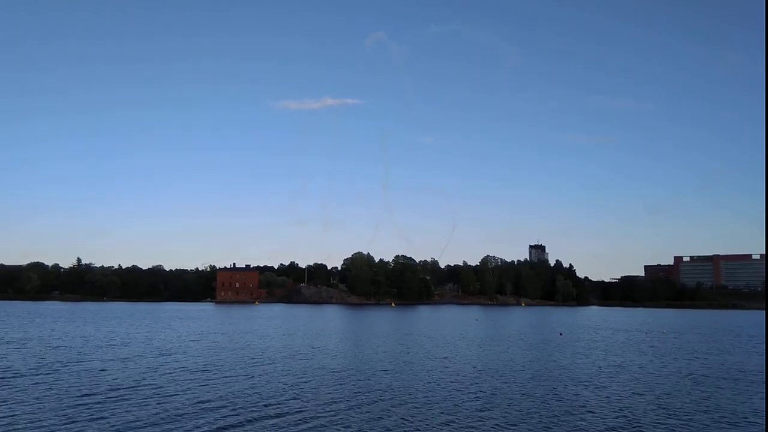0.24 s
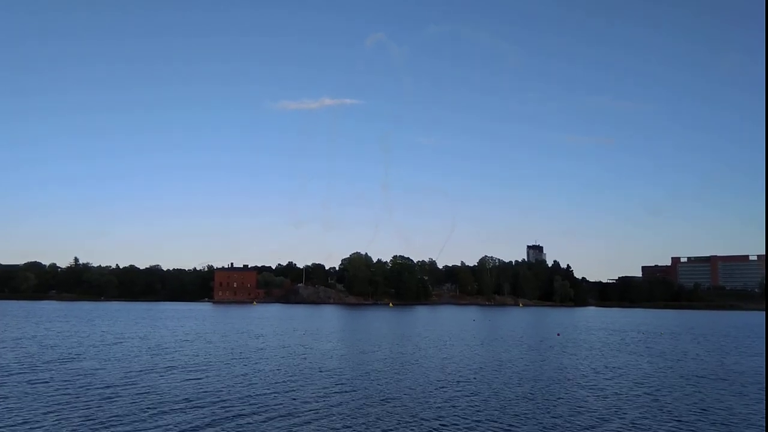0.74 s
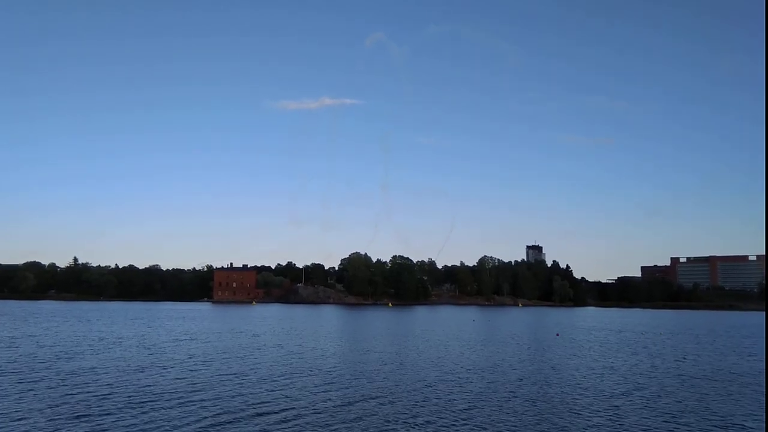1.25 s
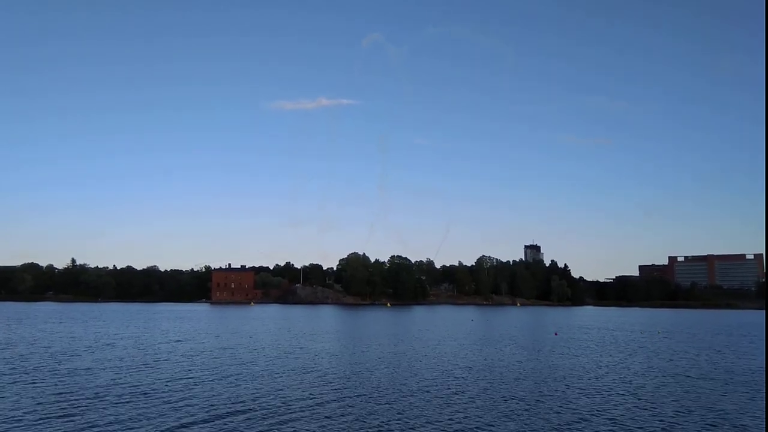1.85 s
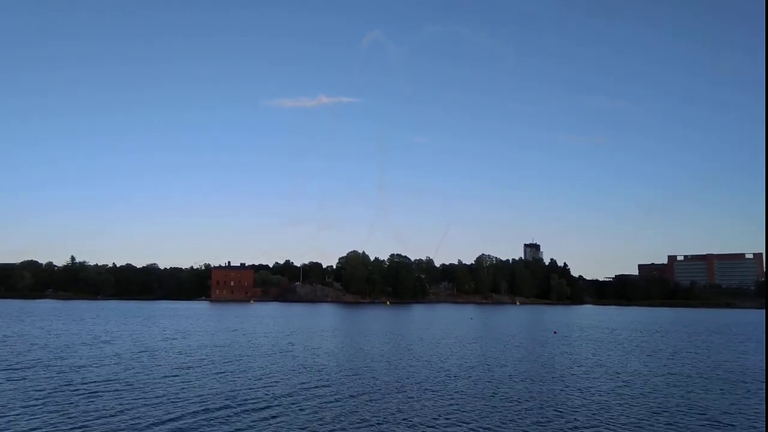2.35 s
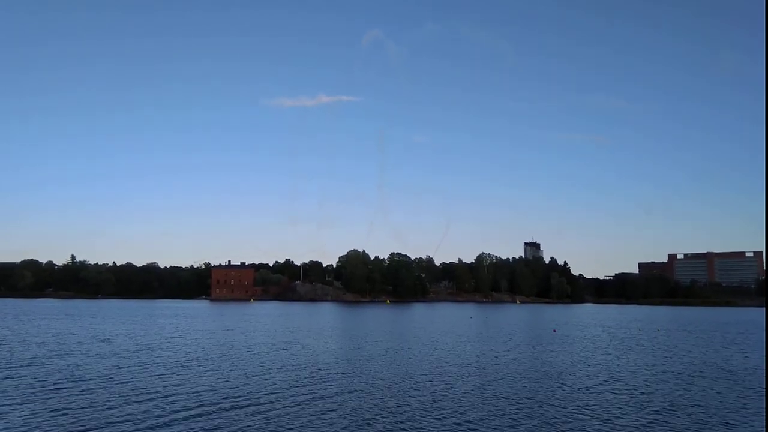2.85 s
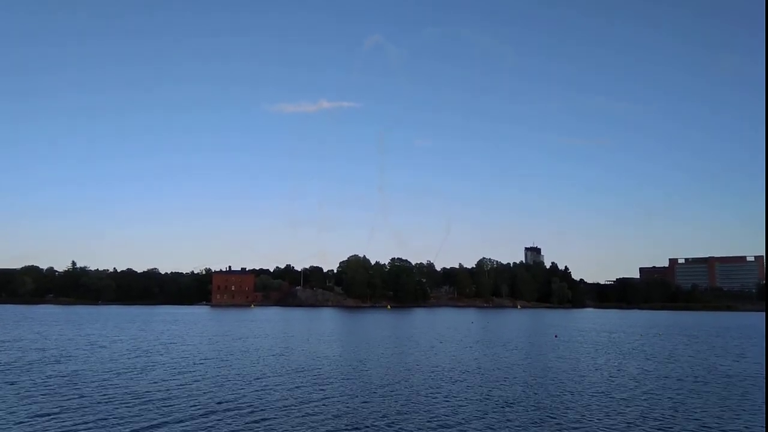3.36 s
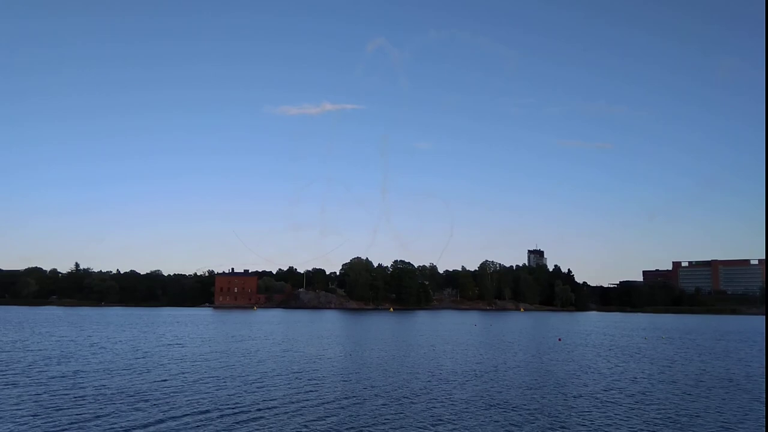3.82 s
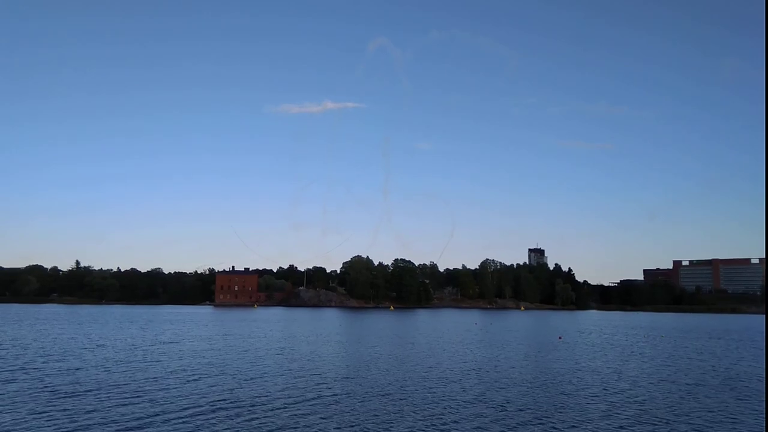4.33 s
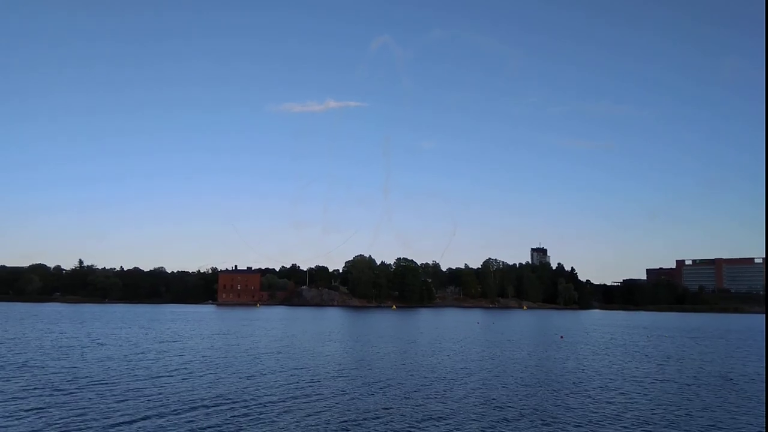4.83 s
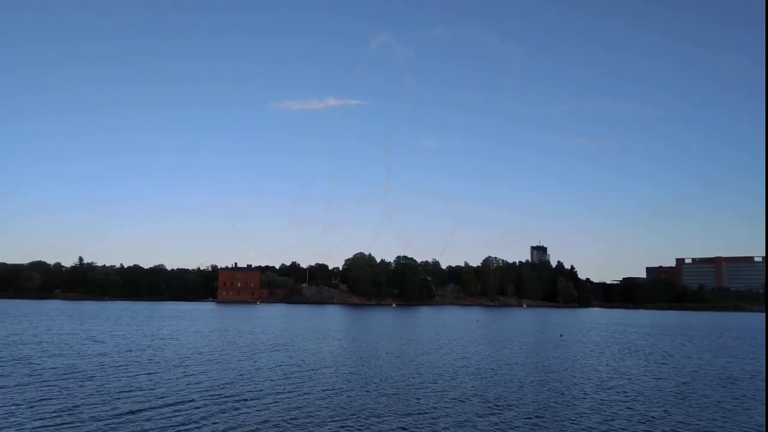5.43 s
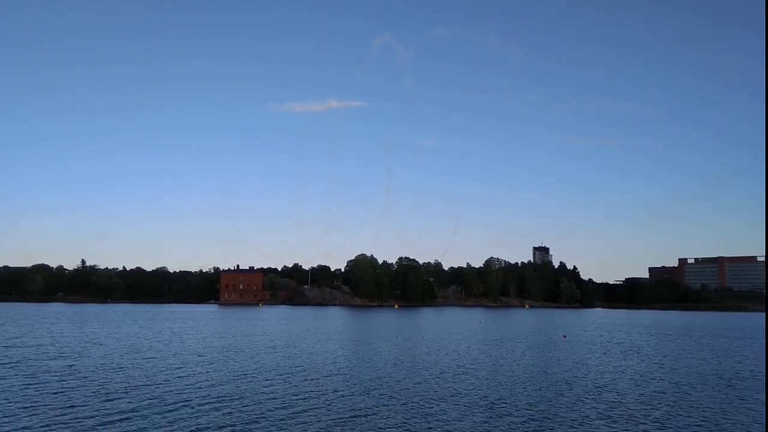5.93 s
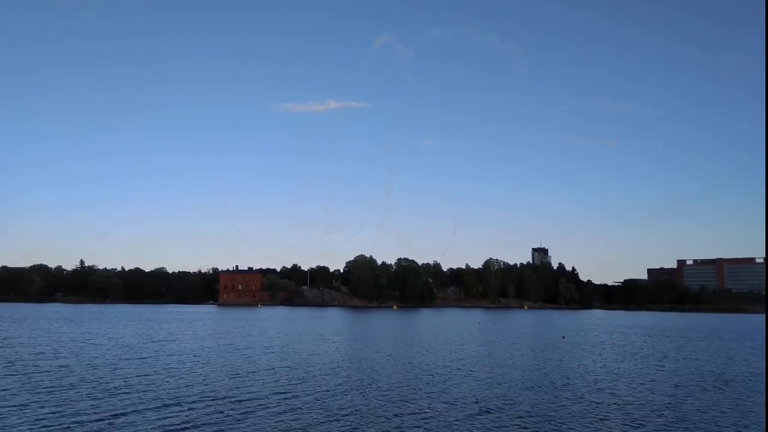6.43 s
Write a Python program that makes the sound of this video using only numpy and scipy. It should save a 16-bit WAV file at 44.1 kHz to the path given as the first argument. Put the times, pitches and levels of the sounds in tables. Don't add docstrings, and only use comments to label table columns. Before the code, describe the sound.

At 0 s a small wave is already breaking on a stony lake shore: a dense half-second flurry of wet slaps, splashing foam and round bubble plops. From 0.5 to 1.7 s the backwash fizzes and drains, with lesser wavelets near 0.7 and 1.35 s and gurgles between stones. The strongest later slap bursts around 1.85-2.1 s, followed by hollow bubbling and small lap sounds to 2.6 s. Another slosh arrives at 2.8-3 s, then a light one at 3.4 s. Around 4-4.5 s there are softer laps and low glugs; near 4.95 s a short splash, then sparse plops, ticks and fine drops as the foam thins. Quiet gurgling remains through 6.6 s. A very faint low traffic rumble and machine hum lie beneath. Close, dry, open-air single-channel sound from a small camera, with faint filtered hiss and limited treble.

```python
import sys
import numpy as np
from scipy import signal
from scipy.fft import rfft, irfft, next_fast_len
from scipy.io import wavfile
from scipy.ndimage import uniform_filter1d, minimum_filter1d

SR = 44100
rng = np.random.default_rng(int(sys.argv[2]) if len(sys.argv) > 2 else 0)


def level_to_linear(level):
    exponent = np.asarray(level, float) / 20
    return 10 ** exponent


def master_out(mix):
    frames = np.transpose(np.atleast_2d(mix))
    ceiling = np.clip(frames, -1, 1)
    pcm = np.round(ceiling * 32767).astype(np.int16)
    wavfile.write(sys.argv[1], SR, pcm)


N = 294588


def unit(x):
    return x / np.sqrt(np.mean(x ** 2) + 1e-20)


def filtered(x, response):
    m = next_fast_len(N + 8192)
    spectrum = rfft(x, m) * response(np.fft.rfftfreq(m, 1 / SR))
    return irfft(spectrum, m)[:N]


def coloured(x, points):
    f, db = np.transpose(points)

    def response(hz):
        return level_to_linear(np.interp(np.log(hz + 1), np.log(f), db, -120, -120))

    return unit(filtered(x, response))


def band(x, lo_hz, hi_hz, order):
    return unit(bandpass(x, lo_hz, hi_hz, order))


def bandpass(x, lo_hz, hi_hz, order):
    return signal.sosfilt(signal.butter(order, [lo_hz, hi_hz], "band", fs=SR, output="sos"), x)


def fine(x):
    return np.interp(np.arange(N) / SR * 1000, np.arange(len(x)), x)


def milliseconds():
    return np.arange(N * 1000 // SR + 2) / 1000


def summed(db):
    return 10 * np.log10(np.sum(level_to_linear(db) ** 2, axis=0))


def bubbles(s, size, hz, life, rise, swell):
    t = np.arange(int(4 * np.max(life) * SR)) / SR
    u = t / life[:, None]
    tone = np.sin(2 * np.pi * hz[:, None] * t * (1 + rise * u / 2))
    wave = size[:, None] * tone * np.exp(-u) * (1 - np.exp(-u / swell))
    start = np.round(s * SR).astype(int)[:, None]
    at = (start + np.arange(len(t))).clip(0, N)
    return np.bincount(at.ravel(), wave.ravel(), N + 1)[:N]


def town():
    # frequency in Hz, level in dB
    rumble_tone = [(15, -47), (25, -34), (54, 5.5), (113, 2.5), (168, -1), (286, -3.5), (342, -9),
                   (520, -13.5), (680, -61), (1140, -120)]
    # pitch in Hz, width in Hz, level in dB
    hum = (123, 9.1, -61)
    hz, width, db = hum
    line = filtered(rng.standard_normal(N), lambda f: 1 / (1 + (2 * (f - hz) / width) ** 2))
    rumble = coloured(rng.standard_normal(N), rumble_tone)
    return level_to_linear(-59) * rumble + level_to_linear(db) * unit(line)


def laps():
    # time in seconds, strength in dB
    ebbing = [(0.0, -38), (0.6, -44), (1.1, -44), (1.6, -46.5), (2.7, -46.5), (3.5, -50), (4.4, -57.5),
              (4.9, -55), (5.7, -59), (6.68, -61)]
    # crest in seconds, foam in dB, length in seconds,
    # slosh over foam in dB, spray over foam in dB
    wavelets = [(0.01, -37, 0.43, -6, -23), (0.142, -33, 0.37, -14.5, -23), (0.385, -40.5, 0.96, -27, -14),
                (0.702, -41, 0.24, -6, -14), (1.358, -38.5, 0.2, -10, -16), (1.891, -41, 0.23, 3.5, -12.5),
                (2.073, -52.5, 0.39, 5, -9), (2.384, -41, 0.13, -0.5, -24), (2.493, -46, 0.17, 0.5, -25),
                (2.902, -36, 0.067, -5, -16), (3.392, -51.5, 0.47, -1.5, -26), (3.607, -51.5, 0.13, 3, -30),
                (3.927, -44.5, 0.21, -22, -14.5), (4.202, -47.5, 0.47, -5.5, -9),
                (4.475, -60.5, 0.42, -4, -6), (4.75, -49, 0.09, -15, -13), (4.966, -42, 0.12, -2, -13.5),
                (5.14, -56, 0.11, -1, -25), (5.366, -54.5, 0.25, 2, -29), (5.46, -53.5, 0.23, -14, -13),
                (5.729, -54.5, 0.14, 2, -20), (5.943, -48, 0.19, -2, -11), (6.208, -58.5, 0.03, 8.5, 1),
                (6.485, -56.5, 0.84, 2.5, -6)]
    run_up, drain_db = 0.48, 14.5
    t = milliseconds()
    s, db, length, slosh_db, spray_db = np.transpose(wavelets)[:, :, None]
    u = (t - s) / length
    lap = db - drain_db * np.maximum(-u / run_up, u / (1 - run_up)) ** 0.88
    ebb = np.interp(t, *np.transpose(ebbing))
    slosh_bed = -59 + 0.089 * (ebb + 50)
    foam_bed = ebb - 6.5 + 0.3 * (ebb + 50)
    spray_bed = -59.5 + (ebb + 50)
    slosh = summed(np.vstack([lap + slosh_db, slosh_bed]))
    foam = summed(np.vstack([lap, foam_bed]))
    spray = summed(np.vstack([lap + spray_db, spray_bed]))
    return fine(slosh), fine(foam), fine(spray), fine(ebb - 3)


def crackle(per_s, spread_db):
    draw = rng.random((int(per_s * N / SR), 3))
    hz = 1300 * np.exp(2.407 * draw[:, 1])
    size = level_to_linear(spread_db * np.minimum(-np.log(draw[:, 2] + 1e-9), 4.5))
    return unit(bubbles(draw[:, 0] * N / SR, size, hz, 2.8 / hz, rise=0.034, swell=0.11))


def patches(x, depth_db, tall, long):
    z = signal.stft(x, nperseg=512)[2]
    field = rng.standard_normal(z.shape)
    for _ in range(2):
        field = uniform_filter1d(uniform_filter1d(field, tall, 0), long, 1)
    return signal.istft(z * level_to_linear(depth_db * unit(field)), nperseg=512)[1][:N]


def wash():
    # frequency in Hz, level in dB per Hz
    slosh_tone = [(1150, 1.5), (1380, 9), (1800, 3), (2200, 2), (2800, -6)]
    foam_tone = [(1060, -79), (1800, -15.5), (2250, -1.5), (2750, -1), (3140, 1.5), (5370, -10),
                 (6890, -13), (8000, -47), (10400, -79), (17600, -120)]
    spray_tone = [(3820, -6), (7000, 2), (8770, -2.5), (14500, -5), (15100, -8), (15900, -4)]
    fizz_tone = [(1200, -42), (1900, 6.5), (2700, -1), (3700, 3), (4600, 0.5), (6200, -7.5), (7300, -25),
                 (8500, -42), (10400, -85)]
    # time in seconds, level against the fine ones in dB
    coarse_share = [(0, -4.5), (.9, -0.5), (1.02, -11), (1.25, -4.5), (1.36, -0.5), (1.52, -3.5),
                    (1.72, -1.5), (1.82, -9), (2.15, 2), (2.25, -8), (2.35, -1), (3.101, 1), (3.3, 1),
                    (3.45, -1), (3.75, -2.5), (3.95, -1.5), (4.3, -5), (4.6, 4), (6.68, -5.5)]
    slosh_db, foam_db, spray_db, fizz_db = laps()
    pops = crackle(1500, spread_db=3.5)

    def noise(share):
        return share * pops + rng.standard_normal(N)

    slosh = coloured(patches(noise(0.6), depth_db=2, tall=2, long=9), slosh_tone)
    foam = coloured(patches(noise(0.35), depth_db=1.5, tall=4, long=8), foam_tone)
    spray = coloured(patches(noise(1.0), depth_db=1.0, tall=8, long=6), spray_tone)
    fizz = coloured(patches(noise(0.19), depth_db=2.0, tall=2, long=18), fizz_tone)
    older = level_to_linear(foam_db) * foam + level_to_linear(fizz_db) * fizz
    coarse = filtered(older, lambda hz: 1 / (1 + (hz / 2550) ** 12))
    share = level_to_linear(np.interp(np.arange(N) / SR, *np.transpose(coarse_share)))
    return level_to_linear(slosh_db) * slosh + older + (share - 1) * coarse + level_to_linear(spray_db) * spray


def filling(rows, trickle_db, trickle_hz):
    t = milliseconds()
    s, length, db, hz = np.transpose(rows)[:, :, None]
    fill_db = 518 * np.maximum(s - t, 0)
    empty_db = 263 * np.maximum(t - s - length, 0)
    level = np.vstack([db - fill_db - empty_db, trickle_db + 0 * t])
    pitch = np.append(hz, trickle_hz)[level.argmax(axis=0)]
    return fine(summed(level)), fine(pitch)


def pocket(level_db, centre_hz, count=2600):
    draw = rng.standard_normal((count, 2))
    s = rng.random(count) * (N - 1) / SR
    hz = centre_hz[(s * SR).astype(int)] * np.exp(0.038 * draw[:, 0])
    swarm = bubbles(s, level_to_linear(1.6 * draw[:, 1]), hz, 8 / hz, rise=0.00045, swell=0.13)
    return level_to_linear(level_db - 4.5) * unit(swarm)


def gurgle():
    # start in seconds, length in seconds, level in dB, pitch in Hz
    deep_pockets = [(0.02, 0.022, -45, 698), (0.13, 0.03, -60, 840), (0.72, 0.03, -60, 710),
                    (1.05, 0.074, -49.5, 800), (1.16, 0.097, -48.5, 816), (1.39, 0.12, -43.5, 726),
                    (2.0, 0.15, -45.5, 787), (2.2, 0.27, -43, 721), (2.57, 0.027, -48, 876),
                    (2.82, 0.11, -44.5, 795), (3.04, 0.14, -49, 714), (3.25, 0.048, -57, 740),
                    (3.45, 0.029, -68, 804), (4.26, 0.051, -60, 690), (4.32, 0.095, -49, 708),
                    (4.46, 0.018, -56, 710), (4.83, 0.084, -48.5, 827), (5.33, 0.05, -49, 772),
                    (5.74, 0.03, -59, 720), (6.2, 0.038, -48.5, 783), (6.28, 0.038, -49.5, 710),
                    (6.39, 0.048, -49, 676.6), (6.56, 0.086, -52, 753), (6.64, .05, -59, 680)]
    shallow_pockets = [(0.03, 0.078, -46.5, 905), (0.32, 0.066, -44.5, 1157), (0.53, 0.033, -48, 1110),
                       (0.72, 0.12, -60, 1216), (0.87, 0.015, -44, 970), (1.15, 0.16, -63, 894),
                       (1.33, 0.14, -48.5, 878), (1.86, 0.02, -41, 1084), (1.97, 0.24, -59, 985),
                       (2.28, 0.14, -47.5, 977), (2.57, 0.03, -47, 928), (2.84, 0.15, -51, 1140),
                       (2.96, 0.14, -44.5, 975), (3.16, 0.073, -48, 1027), (3.45, .04, -72, 893),
                       (3.6, 0.076, -51, 906), (3.95, 0.08, -58.5, 1010), (4.02, 0.33, -50.5, 958),
                       (4.65, 0.18, -51, 893), (4.97, 0.06, -47.5, 986), (5.04, 0.05, -50, 993),
                       (5.38, 0.039, -44.5, 957), (5.47, 0.13, -49, 1250), (2.76, 0.037, -50, 970),
                       (5.63, 0.033, -52, 960), (5.7, 0.051, -73, 980), (5.9, 0.23, -48, 1074),
                       (6.28, .05, -66, 1070), (6.56, .12, -44.5, 1000)]
    # level in dB, pitch in Hz
    trickle = (-64, 2200), (-64, 1200)
    deep = pocket(*filling(deep_pockets, *trickle[0]))
    shallow = pocket(*filling(shallow_pockets, *trickle[1]))
    return deep + shallow


def slaps():
    # time in seconds, peak in dB, ring in Hz, spray in dB
    breaking = [(0.0318, -20, 3430, -15), (0.0715, -20, 3420, -18), (0.1083, -25, 3500, -16),
                (0.1359, -16.5, 3100, -19), (0.148, -16.5, 3100, -28), (0.163, -15, 3280, -22),
                (0.1834, -18.5, 3190, -30), (0.191, -17, 3480, -28), (0.2338, -19, 3100, -35),
                (0.2526, -14.5, 2400, -41), (0.2706, -20, 2560, -33), (0.2992, -19, 2020, -28),
                (0.3046, -19, 2930, -38), (0.3209, -12.5, 3060, -44), (0.359, -17, 1900, -35),
                (0.389, -21, 1910, -30), (0.4185, -24.5, 1940, -31)]
    wavelet_slaps = [(0.5300, -21, 2280, -22), (0.863, -23, 3030, -22), (0.886, -25.5, 1930, -27),
                     (1.356, -23, 3170, -30), (1.3942, -23.5, 2500, -28), (1.7604, -27, 1870, -33),
                     (1.8488, -17, 3780, -22), (1.9008, -19, 1860, -31), (1.9634, -9.5, 2130, -34),
                     (1.999, -13.5, 2640, -30), (2.038, -27, 1700, -32), (2.0547, -13, 2120, -27),
                     (2.0992, -21, 2420, -27), (2.351, -23.5, 3420, -17), (2.4215, -26.5, 2650, -28),
                     (2.5135, -27, 2060, -36), (2.7924, -27.5, 3050, -30), (2.836, -31, 2250, -32),
                     (2.857, -16, 2080, -31), (2.911, -20.5, 2080, -22), (5.28, -33.5, 2030, -32),
                     (3.3528, -32, 3200, -12), (3.4090, -22, 1950, -34), (3.4344, -26.5, 3500, -41),
                     (3.468, -29, 3530, -37), (5.358, -31, 3930, -31), (3.9558, -26, 1930, -18),
                     (4.94, -26.5, 1960, -19), (4.971, -27, 1750, -35), (5.9155, -33.5, 3080, -35)]
    water, spray = np.zeros(N + SR), np.zeros(N + SR)
    t = np.arange(SR // 16) / SR
    fade = level_to_linear(-60 * t / 0.036)
    spray_fade = level_to_linear(-60 * t / 0.039)
    crack_fade = level_to_linear(-60 * t / 0.006) * (1 - np.exp(-t / 0.0001))
    for s, db, hz, spray_db in [*breaking, *wavelet_slaps]:
        burst = rng.standard_normal((3, len(t)))
        ring = band(burst[0], hz / 1.32, hz * 1.14, order=2)
        splash = band(burst[1], 1440, 4000, order=2)
        crack = 7 * np.sin(2 * np.pi * hz * t) * crack_fade
        start = round(s * SR)
        water[start:][:len(t)] += level_to_linear(db - 17.5) * ((1.63 * ring + 1.57 * splash) * fade + crack)
        spray[start:][:len(t)] += level_to_linear(db + spray_db - 4.0) * burst[2] * spray_fade
    soft = bandpass(water, 1150, 5800, order=3)
    return (soft + bandpass(spray, 6000, 15500, order=4))[:N]


def gulps():
    # time in seconds, peak in dB, pitch in Hz, life in seconds
    large_bubbles = [(0.058, -28, 1380, .02), (0.1, -35, 1450, .03), (0.146, -36, 1410, .02),
                     (0.097, -34, 880, .02), (0.14, -30.5, 890, 0.021), (0.239, -24, 1406, 0.0079),
                     (0.32, -24.5, 1005, 0.0085), (0.359, -30, 1348, 0.033), (0.389, -31, 1090, 0.014),
                     (0.724, -35, 690, 0.037), (4.958, -26, 1610, .03), (1.046, -32, 809, 0.013),
                     (1.164, -25.5, 879, 0.027), (1.348, -36, 880, 0.018), (1.961, -34, 1440, 0.0069),
                     (1.998, -20, 1430, 0.01), (2.047, -29.5, 730, 0.037), (2.093, -27, 846, 0.03),
                     (2.261, -25.5, 781, 0.031), (2.706, -32, 730, 0.01), (2.827, -24.5, 840, 0.0064),
                     (2.987, -32, 1052, 0.02), (3.448, -34, 870, 0.061), (5.15, -38.5, 1465, 0.047),
                     (5.2, -40.5, 1420, 0.028), (1.1, -37, 1905, 0.033), (1.56, -43, 2100, .03),
                     (3.28, -41, 1546, 0.027), (5.611, -34, 1278, 0.012), (0.52, -37, 990, 0.032),
                     (3.781, -33, 951, 0.02), (3.578, -30, 1330, 0.016), (3.962, -26, 1030, 0.013),
                     (4.16, -37.5, 1390, 0.051), (4.256, -21.5, 683, 0.015), (4.398, -21, 679, 0.015),
                     (4.968, -28.5, 963, 0.012), (5.3, -35, 2080, 0.048), (5.377, -29.5, 1284, 0.02),
                     (1.62, -39, 1706, 0.037), (1.69, -49, 1750, 0.028), (3.15, -36.5, 1273, 0.034),
                     (3.2, -36.5, 1600, 0.026), (5.493, -27.5, 1231, 0.025), (5.546, -31.5, 1260, 0.047),
                     (5.745, -29.5, 734, 0.019), (6.197, -36.5, 1170, 0.016), (6.557, -33.5, 740, 0.087),
                     (6.645, -27, 719, 0.078)]
    # time in seconds, peak in dB, pitch in Hz
    low_glugs = [(0.277, -34, 529), (0.328, -34.5, 426), (0.369, -32.5, 458), (0.585, -40, 362),
                 (0.855, -37.5, 397), (2.578, -40.5, 366), (3.666, -38.5, 394), (4.237, -35.5, 420),
                 (4.279, -31, 410), (5.739, -58, 614), (6.326, -35.5, 346)]
    blips = [(0.739, -51, 730), (0.788, -39.5, 813), (1.079, -53, 937), (1.209, -51, 912),
             (1.328, -40, 854), (1.409, -33, 709), (1.42, -31.5, 843), (1.477, -34, 740), (1.509, -39, 750),
             (2.006, -38.5, 823), (2.137, -33.5, 880), (2.197, -39, 733), (2.223, -36, 689),
             (2.329, -38.5, 810), (2.376, -36.5, 735), (2.419, -33.5, 705), (2.475, -38.5, 843),
             (2.509, -40, 866), (2.566, -39, 917), (2.599, -39.5, 957), (2.771, -44, 918),
             (2.882, -38, 824), (2.919, -38.5, 737), (3.012, -39.5, 1000), (3.048, -34.5, 720),
             (3.084, -39, 682), (3.157, -38.5, 740), (3.199, -48, 701), (3.229, -45, 937),
             (3.257, -40.5, 739), (3.286, -45, 740), (3.324, -49, 929), (3.372, -41, 1075),
             (3.636, -39, 988), (3.708, -36.5, 957), (4.03, -37, 1024), (4.081, -42.5, 950),
             (4.114, -44, 960), (4.314, -43.5, 650), (4.419, -40, 680), (4.469, -41, 696),
             (4.568, -42, 1020), (4.648, -41, 956), (4.693, -36.5, 928), (4.72, -39, 880),
             (4.778, -36.5, 930), (4.828, -44, 914), (4.856, -41, 819), (4.885, -45, 826),
             (4.909, -48, 821), (5.051, -42, 958), (5.078, -42, 953), (5.135, -45, 1090),
             (5.195, -49, 1040), (5.327, -38, 806), (5.409, -44, 1010), (5.456, -36, 1200),
             (5.64, -43, 920), (5.785, -44, 770), (5.819, -48, 960)]
    glug_rows = [(s, db, hz, 0.014) for s, db, hz in low_glugs]
    blip_rows = [(s, db + 6, hz, 17.2 / hz) for s, db, hz in blips]
    s, db, hz, life = np.transpose([*large_bubbles, *glug_rows, *blip_rows])
    life = np.clip(life, 0.003, 0.06) / 2
    return bubbles(s - 0.003, level_to_linear(db - 2.0), hz, life, rise=0.0069, swell=0.48)


def ticks():
    # time in seconds, peak in dB, pitch in Hz
    bursts = [(0.0608, -25, 3360), (0.2106, -16, 3060), (0.498, -29, 2050), (0.5557, -24, 2080),
              (0.846, -26, 3500), (0.9152, -30, 1970), (0.961, -25, 3120), (1.0063, -26, 2800),
              (1.0498, -33, 3280), (1.0971, -39, 3320), (1.143, -32, 3040), (1.207, -28, 2750),
              (1.2643, -43, 2720), (1.3287, -24, 4040), (1.3794, -22, 3500), (1.4194, -21.5, 2060),
              (1.478, -41, 3100), (1.682, -29, 3780), (1.7102, -27, 2380), (2.0768, -26, 1800),
              (2.399, -26, 2140), (2.845, -23, 2200), (2.9039, -20, 2270), (2.969, -29, 2260),
              (3.0266, -22.5, 3160), (3.0957, -26.5, 2550), (3.1845, -37, 2260), (3.427, -25.5, 2000),
              (3.5563, -39, 3440), (3.8592, -31, 3500), (3.8974, -30, 2770), (3.9144, -38, 2870),
              (4.0335, -27.5, 4000), (4.107, -46, 3100), (4.1506, -32, 2040), (4.2078, -30, 2100),
              (4.3545, -30.5, 4900), (4.4339, -34, 2730), (4.4594, -31, 2550), (4.5117, -35, 3700),
              (4.761, -35, 2300), (4.947, -23, 2010), (4.9594, -27, 2100), (4.984, -32, 2500),
              (5.0948, -30.5, 3750), (5.3159, -27.5, 2050), (5.3912, -34, 3200), (5.9575, -28, 2390),
              (6.4553, -36, 2200)]
    s, db, hz = np.transpose(bursts)
    partner_hz = hz * np.exp(0.43 * rng.standard_normal(len(s))).clip(0.6, 1.7)

    def ring(late_s, size_db, f, cycles):
        return bubbles(s + late_s, level_to_linear(db + size_db), f, cycles / f, rise=0.014, swell=0.13)

    body = ring(0, -5.5, hz, 5.2)
    partner = ring(0.00116, -8.5, partner_hz, 5.2)
    snap = ring(0, -5.0, 1.86 * hz, 1.0)
    return body + partner + snap


def droplets():
    # time in seconds, peak in dB
    dry_drops = [(0.5292, -41), (0.812, -35), (1.4151, -35), (1.679, -38), (1.8447, -39), (1.9654, -39),
                 (1.9963, -43), (2.0552, -42), (2.0981, -42), (2.4054, -37), (2.8574, -33), (2.9018, -37),
                 (3.3507, -43), (4.2577, -40), (4.2881, -41), (6.5106, -63)]
    hissing_drops = [(0.9594, -39), (1.1443, -41), (3.1567, -46), (3.2281, -48), (4.1614, -44), (4.2094, -53),
                     (4.3076, -43), (4.5094, -67), (4.6783, -43.5), (4.9594, -54), (5.0994, -51),
                     (5.2894, -60), (5.5174, -49.5), (5.67, -50), (5.6979, -46.5), (5.8566, -46.5),
                     (6.2033, -59), (6.328, -47), (6.5291, -51)]
    out, t = np.zeros(N + SR), np.arange(SR // 8) / SR
    for rows, hiss_db in ((dry_drops, -40), (hissing_drops, -22)):
        fade = level_to_linear(-60 * t / 0.02) + level_to_linear(hiss_db - 60 * t / 0.25)
        for s, db in rows:
            out[round(s * SR):][:len(t)] += level_to_linear(db - 5) * fade * rng.standard_normal(len(t))
    return bandpass(out, 6000, 15500, order=4)[:N]


def scene():
    return (town() + wash() + gurgle() + slaps() + gulps() + ticks() + droplets())[None]


def denoise(x, hiss, over_db, floor_db, average, hold):
    z = signal.stft(x + hiss, nperseg=512, noverlap=384)[2]
    quiet = signal.stft(hiss, nperseg=512, noverlap=384)[2]

    def smooth(p):
        power = uniform_filter1d(np.abs(p) ** 2, size=2, axis=0)
        return np.abs(uniform_filter1d(power, average, 1, origin=average // 2 - 1)) + 1e-20

    usual_hiss = smooth(quiet).mean(axis=1, keepdims=True)
    excess_db = 10 * np.log10(smooth(z) / usual_hiss) - over_db
    opening = 1 / (1 + np.exp(-np.clip(excess_db / 0.7, -30, 30)))
    held = -minimum_filter1d(-opening, hold, axis=1, origin=hold // 2 - 1)
    depth_db = np.interp(np.fft.rfftfreq(512, 1 / SR), *np.transpose(floor_db))[:, None]
    gain = level_to_linear(depth_db * (1 - uniform_filter1d(held, size=3, axis=1)))
    return signal.istft(z * gain, nperseg=512, noverlap=384)[1][:N]


def band_limit(x):
    return signal.sosfilt(signal.butter(12, 16590, fs=SR, output="sos"), x)


def record(dry):
    # frequency in Hz, level in dB
    hiss_tone = [(250, -22), (340, -7), (900, 0), (1500, -3), (2200, -9), (3200, -14.5), (4500, -20),
                 (6500, -23), (8000, -26), (15800, -33)]
    # frequency in Hz, gain in dB
    shut_depth = [(1500, -15), (2400, -27.5), (4500, -18.5), (5400, -32), (6500, -11), (8500, -32),
                  (10000, -16.5), (12500, -34)]
    hiss = level_to_linear(-45) * coloured(rng.standard_normal(N), hiss_tone)
    clean = denoise(dry[0], hiss, over_db=3.5, floor_db=shut_depth, average=11, hold=10)
    finished = filtered(clean, lambda hz: hz < 15830)[None]
    return band_limit(finished)


dry = scene()
out = record(dry)
master_out(out)
```